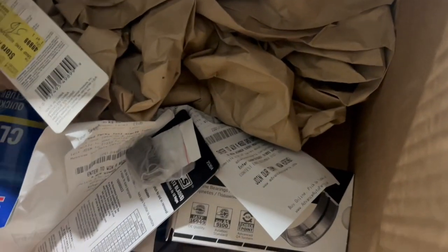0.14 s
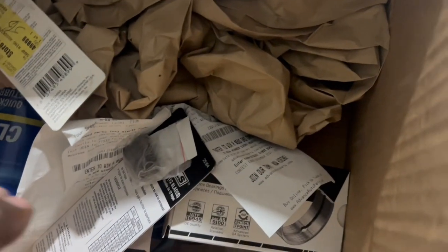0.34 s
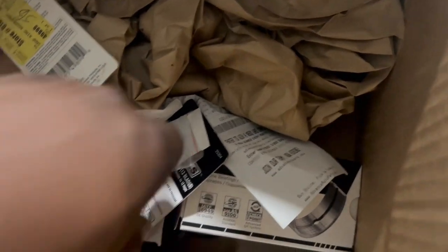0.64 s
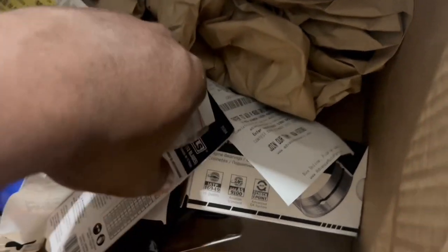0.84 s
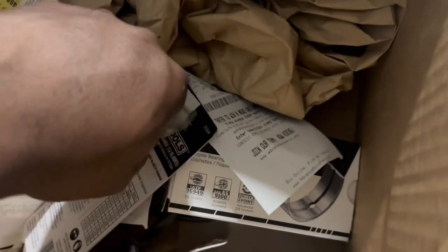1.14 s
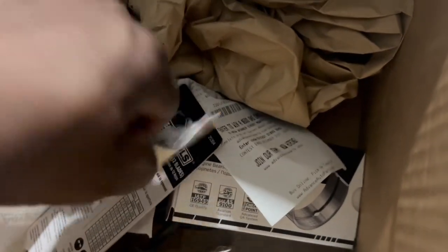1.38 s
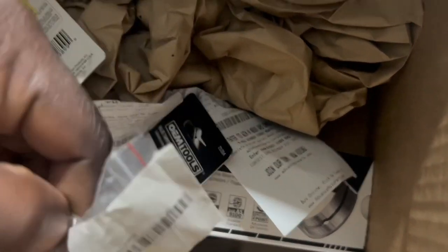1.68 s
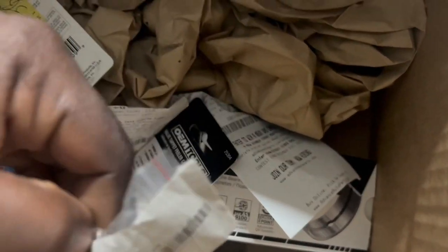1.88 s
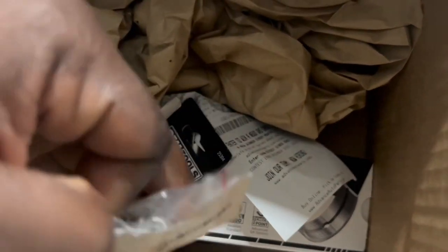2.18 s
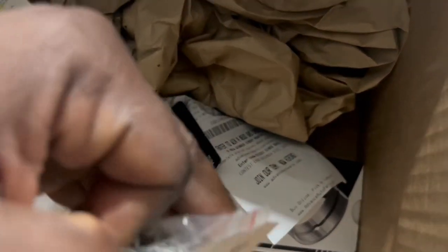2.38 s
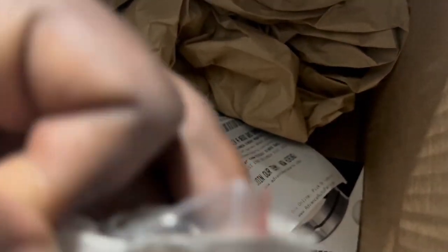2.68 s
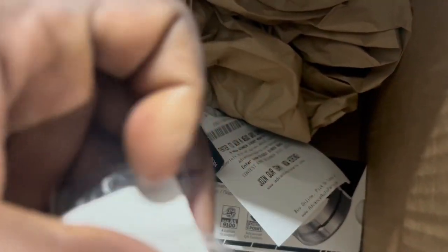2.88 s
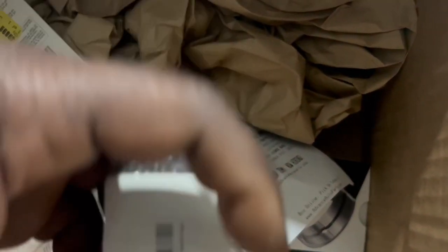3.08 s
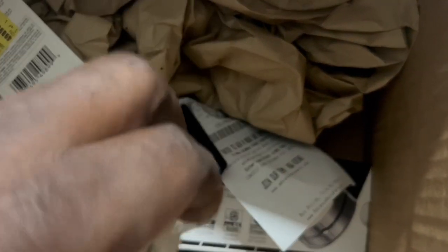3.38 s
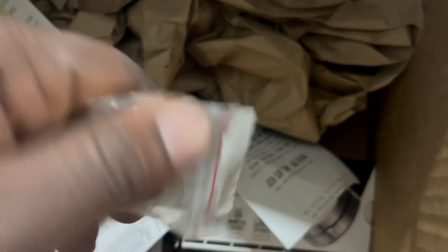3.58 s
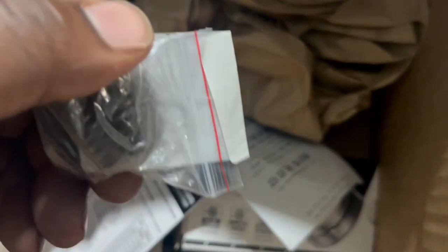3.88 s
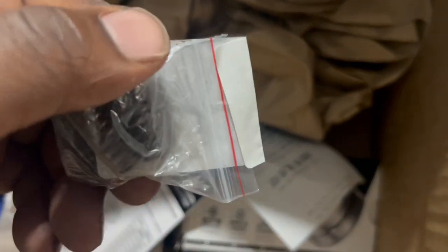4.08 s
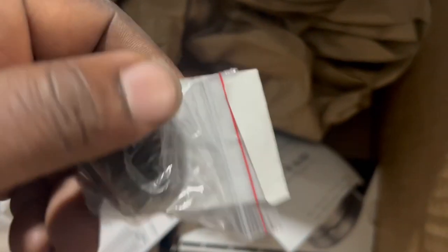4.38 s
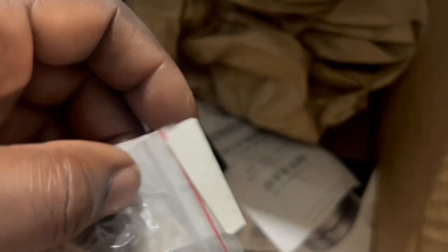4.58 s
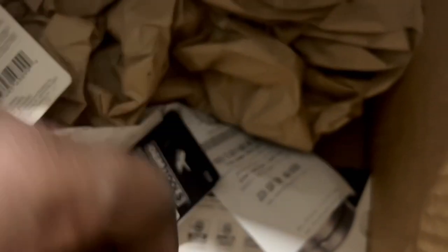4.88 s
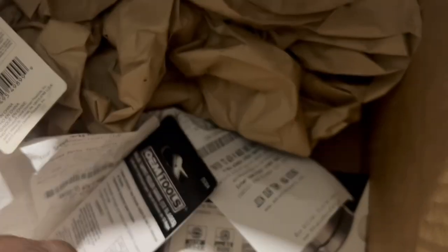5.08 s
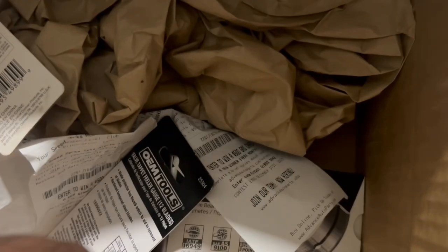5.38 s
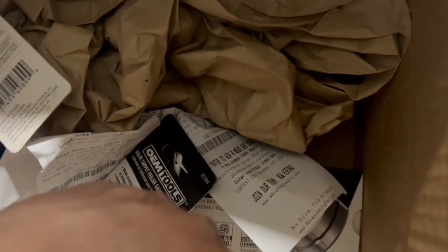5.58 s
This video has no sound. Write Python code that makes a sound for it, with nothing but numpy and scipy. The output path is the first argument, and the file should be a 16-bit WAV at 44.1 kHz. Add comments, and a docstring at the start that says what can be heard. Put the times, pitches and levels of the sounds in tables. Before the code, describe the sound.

A hand rummages in a carton, heard from very near. First a short smooth paper drag and faint thuds, then a dense flurry of sharp paper snaps. Quiet follows, then delicate plastic film crackling that swells, fades almost away and returns. Three boxy knocks, the first strongest, close the scene with duller scrapes. The small dry room has soft low rumble.

```python
"""Crinkling film and card, as a hand drags a sheet in a carton, digs out a plastic bag of steel parts
and works the bag and its paper label, then bumps the carton three times.
Rustle is gated noise plus friction, snaps are short coloured noise pops, the dragged sheet is
filtered noise, bumps are decaying wall modes. A faint rub squeaks once; faint knocks come early.
A quiet room rumbles and hums underneath, in stereo."""
import sys
import numpy as np
from scipy import signal
from scipy.fft import rfft, irfft, next_fast_len
from scipy.io import wavfile
from scipy.ndimage import uniform_filter1d, map_coordinates

SR = 44100
rng = np.random.default_rng(int(sys.argv[2]) if len(sys.argv) > 2 else 0)


def waveform_to_disk(signal):
    """Save audio, clipped to [-1, 1], as 16-bit WAV at the path in sys.argv[1]."""
    frames = np.transpose(np.atleast_2d(signal))
    scaled = np.clip(frames, -1, 1) * 32767
    samples = np.round(scaled).astype(np.int16)
    wavfile.write(sys.argv[1], SR, samples)


N = 253134

# colour of the film rustle and snaps: freq_hz, relative_level_db
FILM_SPECTRUM = [(940, -18.5), (1600, -11), (2280, -4.5), (3330, -7.5), (4320, -4), (6050, -11), (7700, -9),
                 (8620, -10.5), (9720, -26.5), (10500, -17), (11300, -15.5), (12000, -30.5), (12600, -57.5),
                 (22000, -120)]
# colour of the card rustle and snaps: freq_hz, relative_level_db
CARD_SPECTRUM = [(150, -51), (250, -4), (463, -0.5), (627, -9), (959, -7.5), (1380, -14), (1540, -9.5),
                 (2800, -20), (3640, -23.5), (6160, -120)]
# stiff bright paper before, soft film between, dull carton contact after: start_s, end_s
BAG_SPAN_S = (1.3, 5.05)


def amp(db):
    """dB to amplitude ratio."""
    return 10 ** (np.asarray(db) / 20)


def unit(x):
    """x scaled to rms 1."""
    return x / np.sqrt(np.mean(x ** 2) + 1e-20)


def along(points, hz):
    """Interpolate (freq_hz, value) points on a log frequency axis."""
    f, v = np.transpose(points)
    return np.interp(np.log(hz + 1), np.log(f + 1), v)


def wobble(rate_hz):
    """Smooth random curve, rate_hz knots a second."""
    knots = rng.standard_normal(int(N * rate_hz / SR) + 4)
    return map_coordinates(knots, [np.arange(N) * rate_hz / SR])


def filtered(x, response):
    """x times a complex response of frequency."""
    m = next_fast_len(N + SR // 2)
    return irfft(rfft(x, m) * response(np.fft.rfftfreq(m, 1 / SR)), m)[..., :N]


def coloured(x, spectrum):
    """x through a spectrum scaled to keep the loudness of white noise."""
    hz = np.linspace(0, SR / 2, num=4000)
    white_gain = np.sqrt(np.mean(amp(along(spectrum, hz)) ** 2))
    return filtered(x, lambda f: amp(along(spectrum, f))) / white_gain


def patchy(x, depth_db, size=(6, 10)):
    """x with random gain patches, size in frequency bins by frames; rms 1."""
    z = signal.stft(x, nperseg=256)[2]
    field = uniform_filter1d(rng.standard_normal(z.shape), size=size[0], axis=0)
    field = uniform_filter1d(field, size=size[1], axis=1)
    return unit(signal.istft(z * amp(depth_db * unit(field)), nperseg=256)[1][:N])


def crackle(per_s, spread_db, length_s, clump_db):
    """Noise of rms 1 in short bursts of very unequal size, clumped in time."""
    draws = rng.random((2, N))
    size_db = -spread_db * np.log(draws[1] + 0.11) + clump_db * wobble(22.11)
    slips = (draws[0] < per_s / SR) * amp(size_db)
    u = np.arange(SR // 20) / SR / length_s
    power = signal.fftconvolve(slips ** 2, (u * np.exp(-u)) ** 2)[:N]
    return unit(np.sqrt(np.abs(power)) * rng.standard_normal(N))


def squeezing():
    """Film and card gains: each push of the fingers swells, holds and fades; powers add."""
    # pushes: start_s, held_s, film_level_db, card_level_db
    squeezes = [(0.761, 0.0074, -38.5, -41), (.8, 0.066, -46.5, -47), (0.907, 0.021, -40, -39.5),
                (.98, 0.079, -52, -52.5), (1.087, 0.042, -44, -46.5), (1.158, 0.22, -51, -50.5),
                (1.579, 0.021, -63.5, -69), (2.047, 0.011, -58.5, -64.5), (2.168, 0.01, -57.5, -77),
                (2.258, 0.12, -63, -64.5), (2.556, 0.1, -61, -62.5), (2.668, 0.22, -51.5, -59),
                (2.95, 0.069, -60.5, -77), (3.052, 0.076, -55, -59.5), (3.196, 0.037, -46.5, -57.5),
                (3.28, 0.14, -59.5, -64), (3.375, 0.085, -54, -63), (3.43, 0.022, -45, -52),
                (3.465, 0.026, -38.5, -54.5), (3.553, 0.012, -35.5, -53), (3.629, 0.038, -52, -72),
                (3.7, 0.064, -65, -67), (3.775, 0.033, -60, -70), (3.86, 0.047, -69, -73.5),
                (4.05, 0.067, -72, -69), (4.19, 0.06, -70.5, -63), (4.318, 0.092, -57.5, -69),
                (4.417, 0.16, -50.5, -79), (4.541, 0.045, -45, -55), (4.62, 0.14, -56, -91),
                (4.8, 0.11, -57.5, -72), (4.95, 0.079, -61.5, -72), (5.097, 0.037, -58, -58),
                (5.27, 0.01, -49, -61), (5.327, 0.018, -45.5, -50.5), (5.391, 0.036, -62.5, -59.5),
                (5.473, 0.06, -66, -59.5), (5.532, 0.0034, -53, -45), (5.627, 0.093, -64.5, -61),
                (5.7, .06, -61.5, -53.5)]
    press_db_per_s, let_go_db_per_s = 692, 378
    t = np.arange(0, N, 64) / SR
    start, held, *levels_db = np.transpose(squeezes)[:, :, None]
    swell_db = -press_db_per_s * np.maximum(start - t, 0)
    fade_db = -let_go_db_per_s * np.maximum(t - start - np.abs(held), 0)
    gains = []
    for db in levels_db:
        gain = np.sqrt(np.sum(amp(db + swell_db + fade_db) ** 2, axis=0))
        gains.append(np.interp(np.arange(N) / SR, t, gain))
    return gains


def rustle():
    """Countless small creases give way in film and card as the fingers move, over sliding friction."""
    film_gain, card_gain = squeezing()
    grains = crackle(per_s=520, spread_db=2.6, length_s=.0007, clump_db=1.8)
    rub = rng.standard_normal(N)
    # fingers slide more smoothly on the carton
    sliding = np.where(np.arange(N) / SR > BAG_SPAN_S[1], 1.5, .3)
    film = patchy(grains + sliding * rub, depth_db=5, size=(4, 7))
    card = patchy(grains + 1.9 * rub, depth_db=4)
    return film_gain * coloured(film, FILM_SPECTRUM), card_gain * coloured(card, CARD_SPECTRUM)


def snaps():
    """Each crease pops: a few ms of noise coloured by the flipping panel, and a duller card answer."""
    # single creases: time_s, relative_level_db, card_body_db, ring_hz
    creases = [(0.751, -25.5, -11, 4300), (0.7686, -18.5, -10, 4020), (0.7904, -24.5, 1, 4140),
               (0.812, -34, -17, 2040), (0.83, -27, -13, 5600), (.854, -29, -5, 1910),
               (0.8973, -24, -35, 5200), (0.9139, -21, -12, 5000), (.923, -25, 0, 4360),
               (0.9331, -23, -1, 3870), (0.956, -30, 9, 2000), (0.982, -28.5, -18, 3930),
               (1.002, -31.5, -20, 5080), (1.0177, -27.5, 0, 1990), (1.0819, -30.5, -4, 4170),
               (1.1049, -29.5, 2, 5500), (1.156, -30, -1, 1940), (1.175, -40.5, 12, 1900),
               (1.201, -29.5, 1, 4240), (1.2237, -18.5, -39, 5770), (1.2451, -24, -4.5, 5800),
               (1.3247, -30.5, -28, 5200), (1.333, -34.5, -28, 5760), (1.3667, -30, 2, 4700),
               (1.373, -28.5, -1.5, 4930), (1.4228, -26, -12.5, 5987), (1.4951, -19, -12, 3940),
               (2.035, -41, -19, 4250), (2.072, -41.5, -28, 4680), (2.085, -38.5, -11, 4540),
               (2.1425, -41, -25, 3200), (2.155, -38.5, -30, 7500), (2.176, -44, -25, 3600),
               (2.198, -45, -27, 3500), (2.237, -45, -21, 3600), (2.245, -43, -25, 3300),
               (2.262, -40.5, -3, 4470), (2.279, -35, -22, 7420), (2.33, -42, -26, 3080),
               (2.361, -37, -24, 4470), (2.3787, -38, -39, 7370), (2.392, -47, -25, 5070),
               (2.543, -40.5, -5, 7900), (2.577, -37, -4, 3380), (2.674, -36, -13, 2750),
               (2.718, -27, -34, 3540), (2.7427, -28, -35, 3340), (2.81, -32, -10, 4100),
               (2.8721, -21.5, -13, 3400), (2.878, -24.5, -18, 4280), (2.924, -32, -7, 4900),
               (2.954, -27, -17, 4150), (2.966, -36, -20, 4000), (3.009, -46, -25, 7900),
               (3.045, -33, -30, 4480), (3.065, -30.5, -28, 3970), (3.0872, -23, -36, 4270),
               (3.2166, -34, -12, 4800), (3.24, -29, -22, 4670), (3.3744, -31.5, -12, 3200),
               (3.4416, -30, -3, 2020), (3.4708, -29, -12, 4800), (3.497, -35, -19, 3600),
               (3.5916, -27, -29, 2010), (3.6148, -29.5, -37, 1990), (3.66, -41, -14, 4500),
               (3.765, -39, -32, 4000), (3.78, -41, -25, 3960), (3.815, -43.5, -15, 3000),
               (3.844, -49, -5, 2500), (3.884, -47, -20, 4000), (3.916, -39.5, -26, 6600),
               (4.197, -48, -20, 3000), (4.219, -43, -15, 7170), (4.3471, -35, -32, 7480),
               (4.391, -29, -41, 4670), (4.429, -38, -22, 4000), (4.481, -31, -25, 4670),
               (4.5472, -27.5, -11.5, 4200), (4.623, -34.5, -28, 4400), (4.684, -33.5, -30, 4600),
               (4.709, -43, -25, 3800), (4.7442, -38, -5.5, 5000), (4.778, -30, -29, 7170),
               (4.826, -42, -20, 3500), (4.8697, -30, -14, 2960), (4.9229, -24, -12.5, 6240),
               (5.011, -36.5, -16, 7150), (5.092, -27, 2.5, 1710), (5.2176, -43, -11, 3800),
               (5.272, -29.5, 2.5, 2460), (5.331, -23.5, -2.5, 1940), (5.3356, -27, 2.5, 5900),
               (5.3455, -28, 0, 2300), (5.4058, -33, -8, 2010), (5.5287, -34, 0, 2600),
               (5.5332, -30, 7, 1917)]
    # paper, bag, carton
    treble_db, treble_scatter_db = [11.5, 1, -1], 5
    film, card, t = np.zeros(N + SR), np.zeros(N + SR), np.arange(2048) / SR
    f = np.fft.rfftfreq(len(t), 1 / SR)
    u = t - .02
    # a short rounded burst with a weak, wider skirt on both sides
    burst = np.exp(-np.abs(u) / np.where(u < 0, .0011, .0012))
    burst += .06 * np.exp(-np.abs(u) / np.where(u < 0, .006, .009))
    for s, db, body_db, hz in creases:
        bright_db = treble_db[np.searchsorted(BAG_SPAN_S, s)]
        bright_db += treble_scatter_db * rng.standard_normal()
        noise = rfft(rng.standard_normal((2, len(t))))
        panel = 1 + 3 / (1 + ((f - hz) / (.09 * hz)) ** 2)
        treble = amp(bright_db * np.clip((f - 4500) / 3000, 0, 1))
        pop = unit(irfft(noise[0] * amp(along(FILM_SPECTRUM, f)) * panel * treble))
        pop += 0.3 * np.sin(2 * np.pi * hz * t)
        body = irfft(noise[1] * amp(along(CARD_SPECTRUM, f)))
        at = round((s - .019) * SR)
        film[at:at + len(t)] += amp(db - 23.0) * unit(burst * pop)
        card[at:at + len(t)] += amp(db + body_db - 21.0) * unit(burst * body)
    return film[:N], card[:N]


def swish():
    """Smooth sliding friction: a hiss in the sheet's resonances, a duller rush from the wall."""
    # drag levels: time_s, hiss_db, wall_db
    drag = [(0, -46, -43), (.04, -49, -49), (.09, -40, -38), (.15, -40.5, -40.5), (.24, -50.5, -44),
            (.29, -66.5, -57), (.4, -89, -77)]
    # hiss spectrum: freq_hz, relative_level_db
    sheet_spectrum = [(900, -42), (1500, -7.5), (8300, 2.5), (10100, -62.5), (10500, -7), (11800, -10),
                      (12600, -63)]
    # sheet resonances: freq_hz, half_width_hz, boost_db
    sheet_rings = [(1950, 150, 6.5), (2330, 64, 14), (3140, 160, 10.5), (3930, 120, 6), (5040, 320, 6.5)]
    # wall spectrum: freq_hz, relative_level_db
    wall_spectrum = [(70, -25), (170, 0), (460, 0), (1000, -8), (1600, -8), (2800, -18), (6000, -120)]

    def rings(f):
        return amp(sum(db / (1 + ((f - hz) / width) ** 2) for hz, width, db in sheet_rings))

    def boom(f):  # air in the carton
        return amp(9 / (1 + ((f - 371) / 60) ** 2))

    hiss = patchy(rng.standard_normal(N), depth_db=5.5, size=(2, 30))
    hiss = unit(filtered(coloured(hiss, sheet_spectrum), rings))
    wall = patchy(rng.standard_normal(N), depth_db=3.5)
    wall = unit(filtered(coloured(wall, wall_spectrum), boom))
    s, hiss_db, wall_db = np.transpose(drag)
    t = np.arange(N) / SR
    hiss_gain = amp(np.interp(t, s, hiss_db, right=-200))
    wall_gain = amp(np.interp(t, s, wall_db, right=-200))
    return hiss_gain * hiss + wall_gain * wall


def bumps():
    """Bending waves spread in the carton walls, so the low modes arrive after the high ones."""
    # hits: time_s, level_db, hardness_db, weight_db
    hits = [(0.0, -39.5, 1, 8.5), (0.028, -38, 4.5, -19), (0.25, -34, -9, 6.5), (1.2, -38, 0.5, -1),
            (2.869, -43.5, 4, 5), (5.091, -11, 3.5, -7), (5.332, -22, -2.5, 1), (5.533, -30.5, 6.5, 2)]
    # carton wall modes: freq_hz, level_db, t60_s
    modes = [(136, 9, 0.05), (310, 16, 0.015), (291, -12, 0.12), (411, -13, 0.07), (78, 2, 0.13),
             (163.4, -11.5, 0.2), (235.8, -10.5, 0.19), (1028, -25.5, 0.047), (1390, -18, 0.02),
             (1984, -22.5, 0.026), (2650, -27, 0.023)]
    out, t = np.zeros(N + SR), np.arange(SR // 2) / SR
    for s, db, hard_db, weight_db in hits:
        for hz, level_db, t60_s in modes:
            u = np.maximum(t - 0.13 / np.sqrt(hz) + 0.0038, 0)
            tilt_db = hard_db * (hz > 200) + weight_db * (hz < 100)
            onset = (1 - np.exp(-u * hz / 0.5)) ** 2
            ring = -np.sin(2 * np.pi * hz * u) * onset * amp(-60 * u / t60_s)
            gain = amp(db + level_db + tilt_db + rng.normal(0, 1.0))
            out[round(s * SR):][:len(t)] += gain * ring
    return out[:N]


def squeak():
    """Faint short rub: a soft tone of unsteady level and phase swells and fades."""
    # one rub: time_s, pitch_hz, level_db, half_length_s
    rub = (1.94, 1175, -62, .035)
    s, hz, db, half_s = rub
    t = np.arange(N) / SR
    swell = amp(db + 3 * wobble(60)) * np.exp(-((t - s) / half_s) ** 2)
    return swell * np.sin(2 * np.pi * hz * t + 1.3 * wobble(70))


def left_right(x, lead):
    """Phase and level differ between left and right, by frequency."""
    # left over right: freq_hz, level_db
    left_over_right = [(200, -1), (640, 2.5), (1200, 3.5), (2100, -1), (3500, 0)]
    half = np.array([[.5], [-.5]])

    def response(hz):
        return np.exp(1j * half * along(lead, hz)) * amp(half * along(left_over_right, hz))

    return filtered(x, response)


def room(x, decay, size):
    """Diffuse answer: fresh noise left and right, fed by the sound's energy and dying band by band."""
    hz, t, z = signal.stft(x, SR, nperseg=size)
    fade = amp(-120 * t[:150] / np.abs(along(decay, hz))[:, None])  # of energy: 60 dB per t60
    fade /= fade.sum(axis=1, keepdims=True)
    energy = signal.fftconvolve(np.abs(z) ** 2, fade, axes=1)[:, :len(t)]
    fresh = signal.stft(rng.standard_normal((2, N)), SR, nperseg=size)[2]
    fresh /= np.sqrt(np.mean(np.abs(fresh) ** 2))
    return signal.istft(np.sqrt(np.abs(energy)) * fresh, SR, nperseg=size)[1][:, :N]


def room_tone():
    """Rumble of the building, partly alike left and right, with an unsteady mains hum."""
    # rumble spectrum: freq_hz, relative_level_db
    air_spectrum = [(20, -35), (47, -7.5), (109, -6), (132, -12), (147, -19), (182, -9.5), (238, -11),
                    (338, -28), (367, -21.5), (780, -29.5), (1050, -30.5), (1170, -30), (1450, -35.5),
                    (1900, -42), (4500, -54), (8500, -65), (12500, -80.5), (22000, -120)]
    # left-right likeness: freq_hz, correlation
    likeness = [(60, 0.89), (230, 0.89), (860, 0.062), (3270, 0.067), (12400, 0.22)]
    # hum tones: freq_hz, relative_level_db
    hum_tones = [(59.2, -53.5), (118.4, -59), (183.0, -66.5), (473.7, -74.5)]
    air_db = -52.5

    def mid_side(hz):
        turn = np.arccos(np.clip(along(likeness, hz), -1, 1)) / 2
        return amp(along(air_spectrum, hz)) * [np.cos(turn), np.sin(turn)]

    mid, side = filtered(rng.standard_normal((2, N)), mid_side)
    air = unit(np.array([mid + side, mid - side]))
    air = amp(air_db + 1.2 * wobble(2.72)) * amp([[-.6], [.6]]) * air
    t, hum = np.arange(N) / SR, np.zeros(N)
    for hz, db in hum_tones:
        level = amp(db + 1.5 + 2.6 * wobble(6.6))
        hum += level * np.sin(2 * np.pi * hz * t + 1.16 * wobble(8.4))
    return air + hum


def scene():
    """Near sources in stereo, their scatter in the carton, the room's answer and room tone."""
    # left phase over right until the bag span ends: freq_hz, lead_rad
    lead_aside = [(1000, 0), (1700, 1.5), (2400, 3.5), (3100, 6.3), (8300, 6.3), (9000, 9.4), (10300, 9.4),
                  (10900, 12.6)]
    # left phase over right after it, straight ahead: freq_hz, lead_rad
    lead_ahead = [(1700, 0), (2400, 1.1), (3300, 1.3), (3900, 0), (8300, 0), (9000, 3.1), (10300, 3.1),
                  (10900, 6.3)]
    # scattering between the carton walls: freq_hz, t60_s
    carton_decay = [(300, 0.097), (2000, 0.038), (10000, 0.038)]
    # share of the rustle that arrives scattered: freq_hz, level_db
    scatter_share = [(300, -15.5), (1200, -4), (2500, -5), (4000, -6), (6000, -4), (8000, -7), (11000, -4)]
    # room reverberation: freq_hz, t60_s
    room_decay = [(200, 0.37), (2000, 0.023), (10000, 0.15)]
    rustle_film, rustle_card = rustle()
    snap_film, snap_card = snaps()
    paper = rustle_film + rustle_card + snap_film + snap_card + swish()
    carton = bumps()
    # the last rustles come from straight ahead
    ahead = np.clip((np.arange(N) / SR - BAG_SPAN_S[1]) / .02, 0, 1)
    near = left_right(paper * (1 - ahead), lead_aside) + left_right(paper * ahead, lead_ahead)
    near += carton * amp([[.4], [-.4]]) + squeak()
    scattered = room(paper, carton_decay, size=128)
    scattered = filtered(scattered, lambda hz: amp(along(scatter_share, hz)))
    far = room(carton + 1.34 * paper, room_decay, size=256)
    # long waves reach left and right more alike
    far += filtered(far[:1] - far, lambda hz: .7 / (1 + (hz / 500) ** 2))
    return near + scattered + amp(-8.5) * far + room_tone()


def record(dry):
    """The phone keeps nothing above its band limit."""
    top_hz, slope_hz = 12400, 200
    return filtered(dry, lambda hz: np.clip((top_hz - hz) / slope_hz, 0, 1))


dry = scene()
out = record(dry)
waveform_to_disk(out)
```